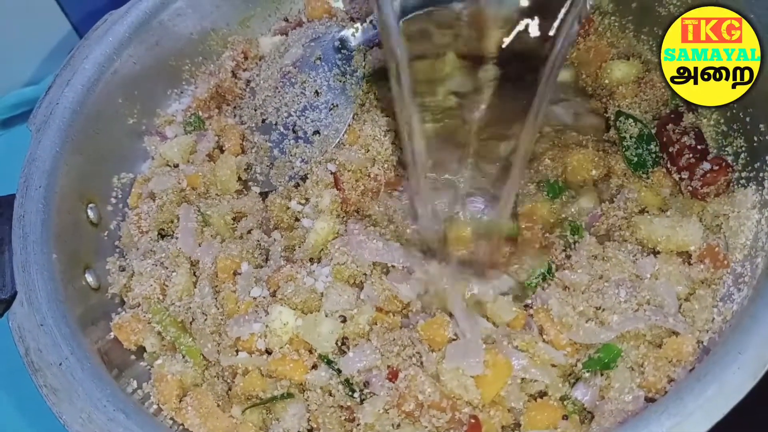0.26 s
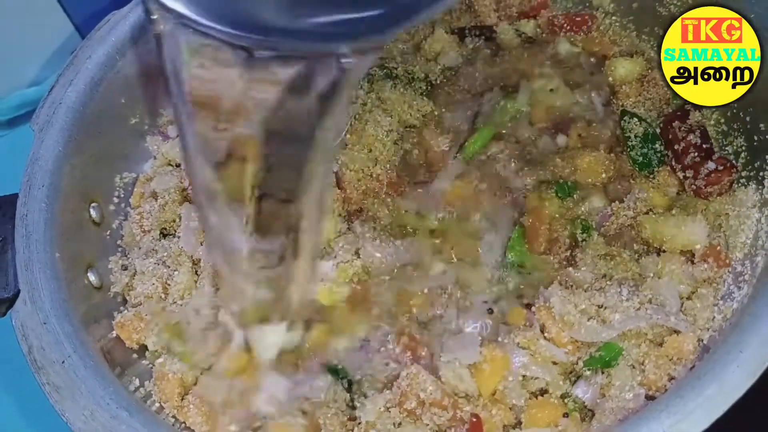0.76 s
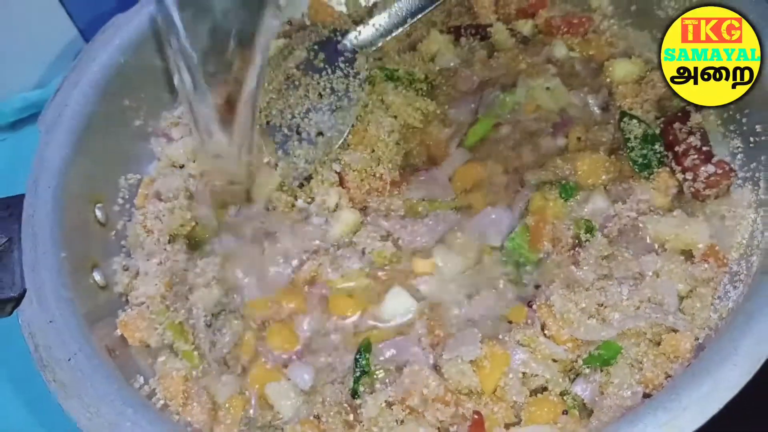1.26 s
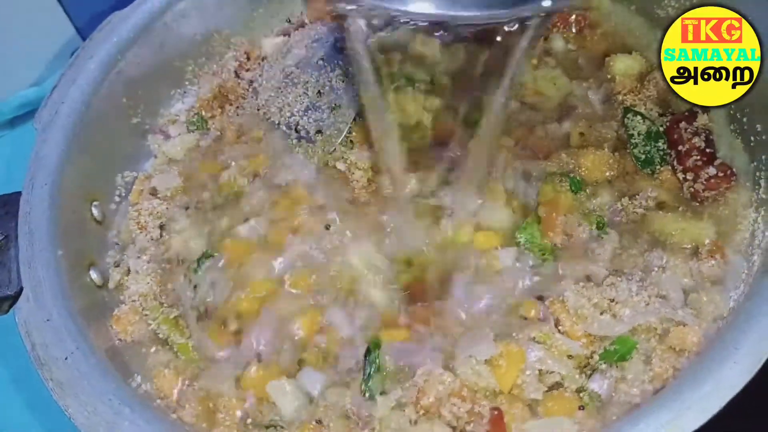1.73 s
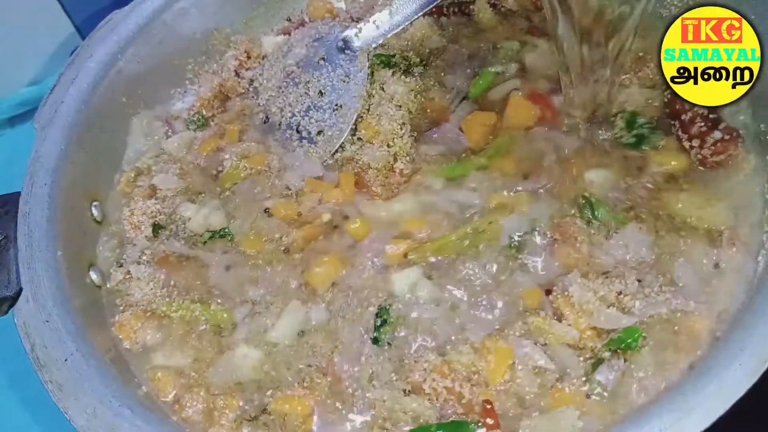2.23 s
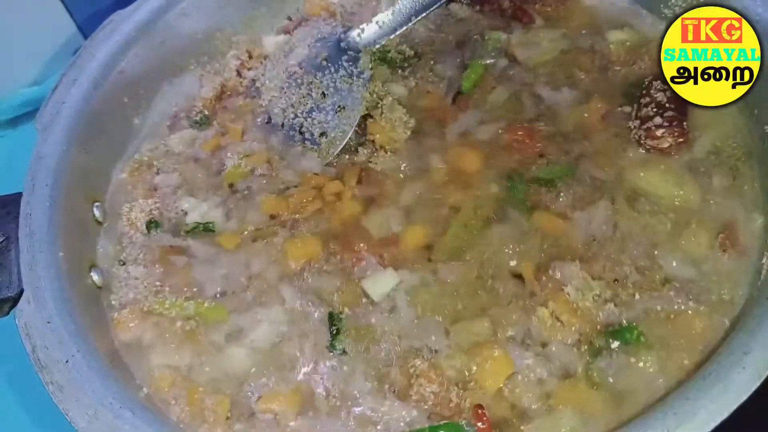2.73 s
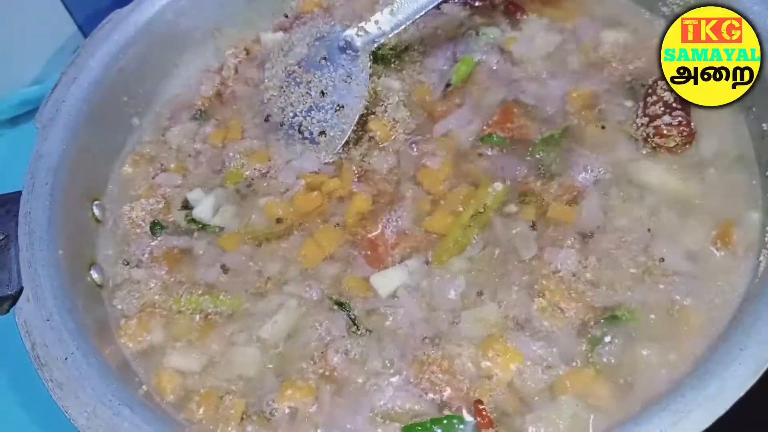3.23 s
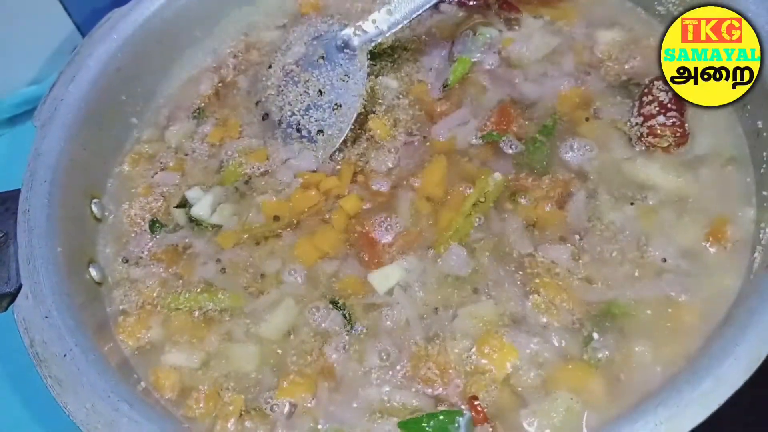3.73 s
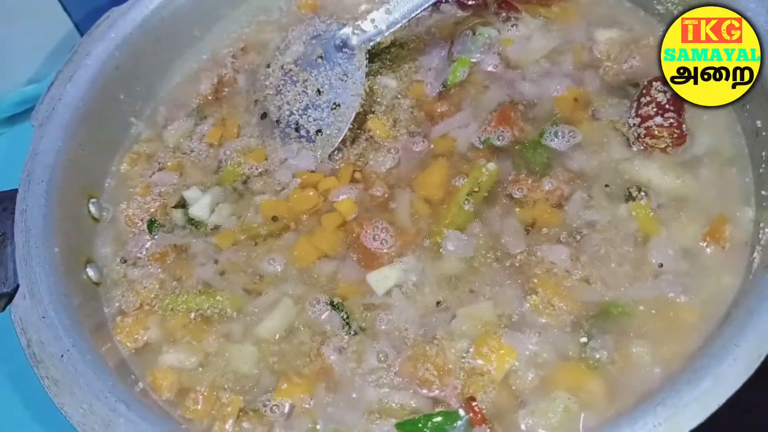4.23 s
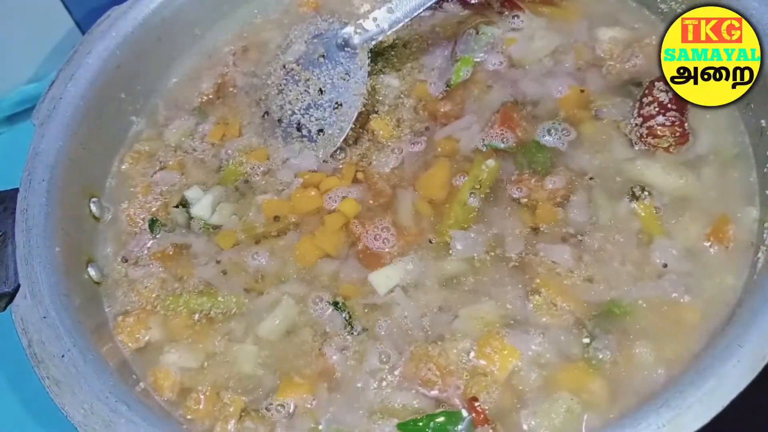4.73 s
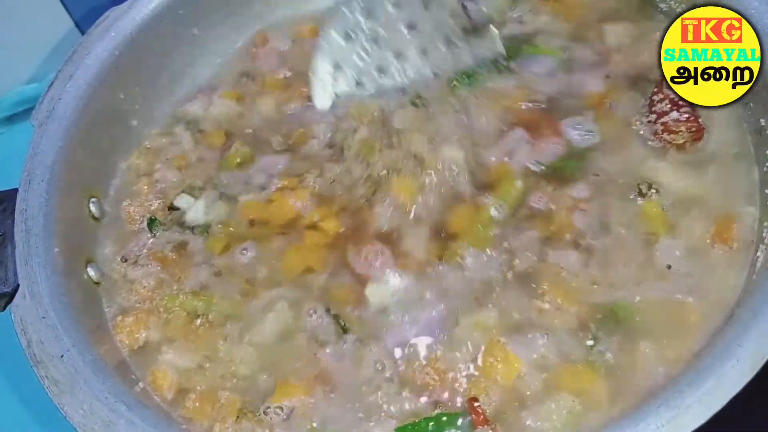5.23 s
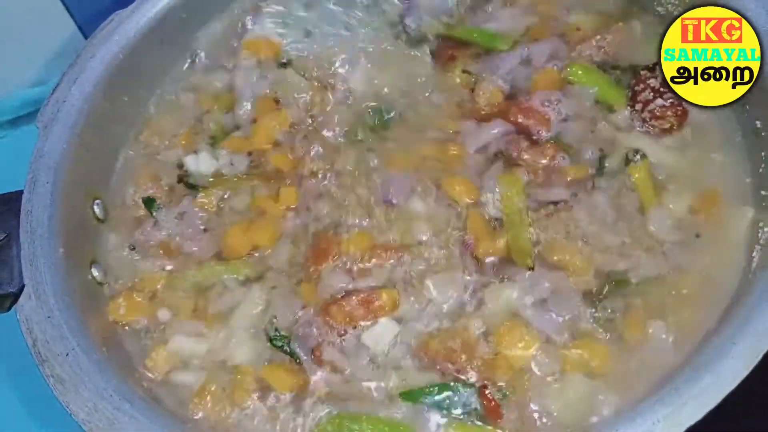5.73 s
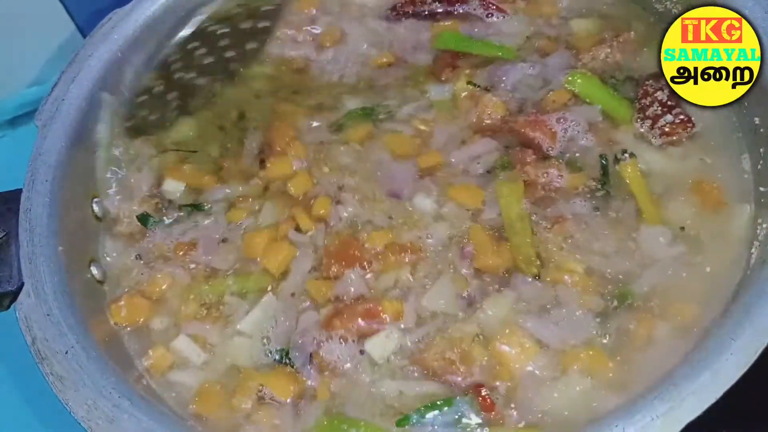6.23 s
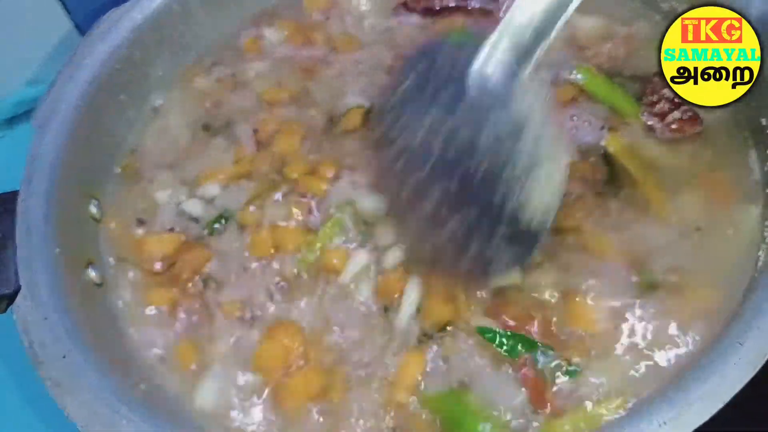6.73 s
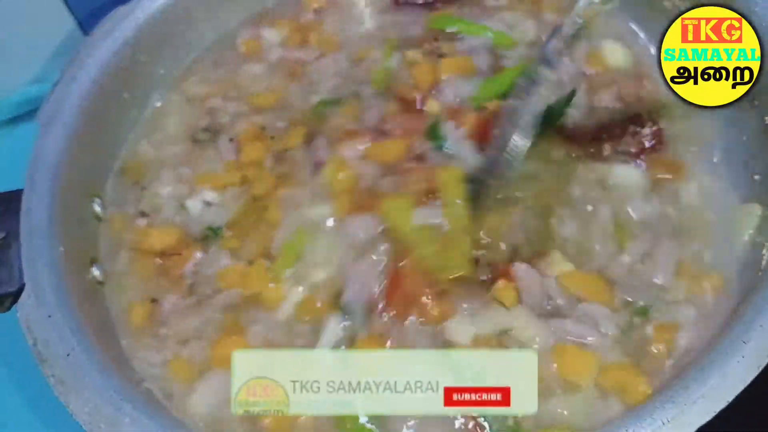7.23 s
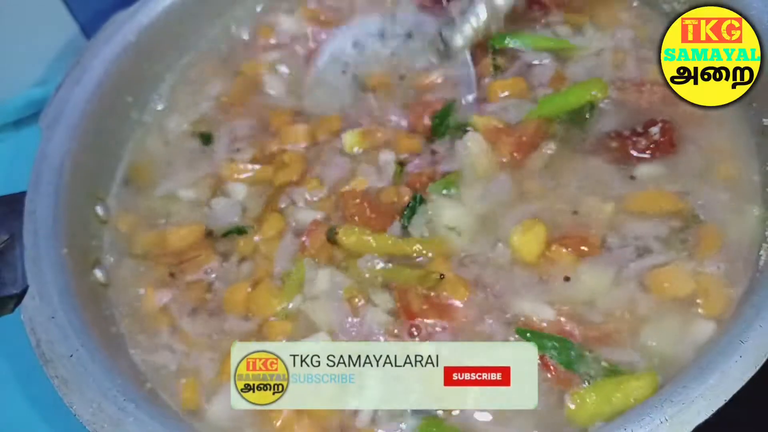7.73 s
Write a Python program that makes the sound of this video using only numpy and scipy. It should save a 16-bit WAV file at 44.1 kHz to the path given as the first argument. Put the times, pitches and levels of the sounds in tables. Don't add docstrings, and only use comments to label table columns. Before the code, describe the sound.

A phone placed near the stove picks up a strong crackling steam hiss for about three seconds, fading to almost nothing by four. A short, bright metallic clatter follows as a jug lands and bounces. Quiet bubbling, small spits and a faint gas hiss remain, with gentle sloshes from stirring. Two groups of ringing ladle strikes on the wet pan end with short room tails, over dull low bumps.

```python
import sys
import numpy as np
from scipy import signal
from scipy.fft import rfft, irfft
from scipy.io import wavfile
from scipy.ndimage import uniform_filter1d, map_coordinates

SR = 44100
rng = np.random.default_rng(int(sys.argv[2]) if len(sys.argv) > 2 else 0)


def transcribe(u):
    v = np.clip(np.atleast_2d(u).T, -1, 1)
    q = np.round(v * 32767).astype(np.int16)
    wavfile.write(sys.argv[1], SR, q)


def boost_factor(decibels):
    exponent = np.asarray(decibels, float) / 20
    return 10 ** exponent


N = 351918
T = np.arange(N) / SR
TOP_HZ = 15750
PORTS = np.array([[1], [-1]])

ZONE_EDGES_HZ = [240, 1550, 5050, 9200, 15700]
SIMMER_EDGES_HZ = [380, 1550, 3200, 5200, 6900]
# frequency_hz, level_db (per Hz)
SPRAY_COLOUR = [(8600, -25), (9300, -33), (10300, -14), (11500, -26), (12200, -6.5), (14900, -6),
                (15700, 2.5)]


def unit(x):
    return x / np.sqrt(np.mean(x ** 2))


def columns(rows):
    s, *cols = np.transpose(rows)
    return [np.interp(T, s, c) for c in cols]


def zone(x, edges, k):
    return signal.sosfilt(signal.butter(4, edges[k:k + 2], "bandpass", fs=SR, output="sos"), x)


def zoned(x, edges, gains):
    return [g * unit(zone(x, edges, k)) for k, g in enumerate(gains)]


def ring(x, hz, width_hz):
    return signal.lfilter(*signal.iirpeak(hz, hz / width_hz, fs=SR), x)


def tint(x, colour):
    hz, db = np.transpose(colour)
    log_hz = np.log(np.arange(1025) * SR / 2048 + 1)
    log_gain = np.log(boost_factor(np.interp(log_hz, np.log(hz), np.maximum(db, -50))))
    cepstrum = irfft(log_gain)
    cepstrum[1:1024] *= 2
    cepstrum[1025:] = 0
    response = irfft(np.exp(rfft(cepstrum)))
    return unit(signal.fftconvolve(x, response)[:len(x)])


def walk(rate):
    k = int(SR / rate)
    held = np.repeat(rng.standard_normal(N // k + 1), k)
    return unit(uniform_filter1d(uniform_filter1d(held, k), k)[:N])


def crackle(rate, spread_db):
    out, count = np.zeros(N), int(rate * N / SR)
    size_db = np.minimum(spread_db * rng.standard_exponential(N // 4), 5 * spread_db)[:count]
    at = rng.integers(0, N, N // 4)[:count]
    out[at] = rng.standard_normal(N // 4)[:count] * boost_factor(size_db)
    return unit(out)


def patchy(x, patch_db, patch_s, patch_hz, size=512):
    hz, s, spec = signal.stft(x, SR, nperseg=size)
    field = rng.standard_normal((400, 400))
    spots = map_coordinates(field, np.meshgrid(hz / patch_hz, s / patch_s, indexing="ij"), order=1)
    return signal.istft(spec * boost_factor(patch_db * spots), SR, nperseg=size)[1][:N]


def add(out, s, burst):
    at = int(s * SR)
    out[at:at + len(burst)] += burst[:len(out) - at]


def steam(colour, rate, spread_db, share, flicker_db):
    flicker = boost_factor(flicker_db * walk(14))
    return flicker * tint(share * crackle(rate, spread_db) + rng.standard_normal(N), colour)


def fine_steam(colour, rate, flicker_db):
    return unit(zone(steam(colour, rate, 2.2, .55, flicker_db), ZONE_EDGES_HZ, 3))


def steam_zones():
    # time_s, level_db, brightness_db, gurgle_db
    pour_curve = [(0.0, -28.5, 2, 3), (0.1, -25.5, 1, 0), (0.33, -22, -1.5, -4), (0.8, -23, 0, 0),
                  (1.03, -22.5, 2, 2), (1.45, -25.5, 2.5, 1), (2.2, -26, 2.5, -2), (2.55, -29.5, 3, -4),
                  (2.7, -27.5, 3, -5), (3.3, -30, 3, -2), (3.55, -34, 2, -5), (3.9, -40.5, 0, -3),
                  (4.27, -46.5, -4, -5)]
    # offset_db, brightness_share, gurgle_share
    pour_zones = [(-18, 0, 1.1), (-7.5, 0, .4), (-.6, 0, 0), (-3.8, 1, 0), (-16, 1.2, 0)]
    flutter_db = [1.8, 1.2, .4, .4, .4]
    level, bright, gurgle = columns(pour_curve)
    dbs = [level + db + b * bright + g * gurgle + f * walk(16)
           for (db, b, g), f in zip(pour_zones, flutter_db)]
    return boost_factor(np.array(dbs))


def boiling():
    # frequency_hz, level_db (per Hz)
    pour_colour = [(240, -28.5), (320, -13), (430, -17), (620, -10), (800, -8.5), (1170, 3.5), (1900, -1),
                   (2750, 3), (3050, -1), (4450, -1), (6050, 2), (7400, -6.5), (8500, -16), (9200, -22.5)]
    # frequency_hz, width_hz, level_db
    bubbles = [(320, 40, -29), (405, 30, -29), (1160, 150, -16), (1950, 300, -13), (2720, 260, -12),
               (3450, 300, -12), (4400, 350, -15), (5900, 450, -11)]
    # frequency_hz, width_hz, dry_depth (0-1),
    # flooded_depth (0-1)
    hollows = [(400, 130, 0., .7), (800, 150, 0., .55), (1520, 200, .45, .45)]
    flood_s = (1.4, 2.4)
    # middle_s, reach_s, frequency_hz, width_hz, level_db
    surges = [(.42, .15, 1170, 150, 1.5), (.75, .35, 7000, 1200, 2), (.85, .3, 770, 160, 5),
              (1.2, .4, 570, 200, -5), (1.7, .2, 890, 160, 4), (1.8, .3, 1950, 600, 3),
              (1.95, .3, 300, 110, -6), (2.25, .5, 560, 170, 6), (2.3, .3, 2050, 500, 4),
              (2.35, .45, 4700, 1100, 3), (2.8, .35, 800, 200, -7), (2.85, .25, 400, 130, -8),
              (3.2, .3, 540, 250, 6), (3.2, .25, 2080, 450, 4), (3.5, .15, 350, 120, -7),
              (3.7, .2, 2000, 500, 3), (3.98, .2, 500, 220, 7), (4.1, .25, 790, 250, -8),
              (2.7, .12, 6000, 900, 2), (.6, .5, 2700, 500, 1.5)]
    out = patchy(steam(pour_colour, 4000, 2.2, .4, .5), 2, .16, 260, size=256)
    for hz, width_hz, db in bubbles:
        bubble = unit(ring(crackle(width_hz * 5, 2.0), hz, width_hz))
        out = out + boost_factor(db + 2.0 * walk(5)) * bubble
    flood = np.interp(T, flood_s, [0, 1])
    for hz, width_hz, dry_depth, wet_depth in hollows:
        depth = dry_depth + (wet_depth - dry_depth) * flood
        out = out - depth * ring(out, hz, width_hz)
    for s, reach, hz, width_hz, db in surges:
        swell_db = db * np.exp(-((T - s) / reach) ** 2)
        out = out + (boost_factor(swell_db) - 1) * ring(out, hz, width_hz)
    return out


def pouring(share):
    pour_edges_hz = [240, 850, 1550, 5050, 9200]
    # frequency_hz, level_db (per Hz)
    fizz_colour = [(8600, -7), (9290, -21), (9900, -11.5), (10800, -13.5), (11500, -16.5), (12300, -11.5),
                   (14900, -4.5), (15700, -6)]
    *body_gains, fizz_gain = steam_zones() * share
    sizzle = sum(zoned(boiling(), pour_edges_hz, body_gains))
    return sizzle, fizz_gain * fine_steam(fizz_colour, 3000, 1.2)


def rattle_zones():
    # time_s, shaking_db
    rattle = [(4.295, -20), (4.33, -18.5), (4.36, -21), (4.405, -24), (4.412, -21), (4.425, -20.5),
              (4.48, -22), (4.545, -23.5), (4.68, -41), (4.775, -53), (4.85, -60)]
    # full_shaking_db, slope (dB per dB of shaking)
    rattle_slopes = [(-27, .75), (-18, 1.05), (-30, .95), (-43, 2.1)]
    shake = columns(rattle)[0] - rattle[1][1]
    return boost_factor(np.array([db + slope * shake for db, slope in rattle_slopes]))


def jug():
    # frequency_hz, level_db (per Hz)
    jug_colour = [(120, -46.5), (200, -14), (380, -18), (471, -8), (550, -13), (711, -9.5), (880, -23),
                  (1150, -5), (1410, -6.5), (1730, -4), (2200, -6), (2610, -3), (3680, -5), (4350, -11),
                  (4750, -20), (5400, -15), (6590, -18), (8500, -25), (8900, -36)]
    # frequency_hz, level_db (per Hz)
    sheen_colour = [(8800, 0), (11200, -3), (11800, -9), (14900, -2)]
    # start_s, peak_db, ring_hz
    bounces = [(4.2848, -8.5, 3280), (4.2998, -6.5, 2700), (4.3114, -7.5, 2690), (4.3218, -4.5, 1710),
               (4.3298, -2.5, 1820), (4.3394, -5, 2550), (4.3754, -11, 2600), (4.414, -8.5, 2630),
               (4.4225, -4.5, 3590), (4.4353, -15, 1760), (4.4514, -13.5, 3110), (4.478, -10.5, 3140),
               (4.4984, -12, 3150), (4.5394, -11, 3280)]
    clash = 0.59 * crackle(3000, 2.2) + rng.standard_normal(N)
    chatter = patchy(tint(clash, jug_colour), 3.5, .04, 110, size=1024)
    *body_gains, sheen_gain = rattle_zones()
    sheen = sheen_gain * unit(zone(tint(clash, sheen_colour), [8800, TOP_HZ], 0))
    gate = np.clip((T - bounces[0][0]) / .0015, 0, 1) * np.clip((4.9 - T) / 0.13, 0, 1)
    out = gate * boost_factor(-1.5) * (sum(zoned(chatter, ZONE_EDGES_HZ, body_gains)) + sheen)
    t = T[:SR // 8]
    shape = boost_factor(-60 * t / 0.075) - boost_factor(-60 * t / 0.00597)
    for s, db, hz in bounces:
        add(out, s, boost_factor(db - 9.5) * np.sin(2 * np.pi * hz * t) * shape)
    return out


def ladle():
    # start_s, thud_db, clang_db, tick_db,
    # strongest_ring_hz
    clinks = [(6.275, -70, -56, -54, 5200), (6.3716, -42, -38, -41, 2680), (6.4176, -34, -27, -26, 6150),
              (6.4342, -23, -18, -30, 2315), (6.4501, -34, -29, -36, 3370), (6.4872, -34, -33, -46, 2200),
              (6.5269, -36, -38, -50, 1000), (6.5856, -42, -44, -54, 3100), (6.6314, -46, -54, -56, 1220),
              (6.679, -60, -60, -54, 7600), (7.0446, -29, -18, -18.5, 5770), (7.1087, -21, -12, -29, 2720),
              (7.123, -30, -20, -40, 2020), (7.143, -32, -23, -42, 2560), (7.1685, -29, -23, -42, 2300),
              (7.1919, -27, -27, -57, 1290), (7.2234, -29, -31, -56, 1280), (7.3747, -54, -54, -52, 6000),
              (7.5883, -68, -64, -48, 5820), (7.6274, -70, -73, -60, 6450)]
    # frequency_hz, first_stir_db, second_stir_db, t60_s
    pan_modes = [(325, 1, -8.5, .2), (414.4, 2.5, -15, 0.28), (737, -7, -1, .2), (1200, -2, -7, 0.43),
                 (1240, 0, -3, 0.34), (1346, -6, 4.5, .2), (1754, -11, 1, 0.29), (2054, 10, 3, 0.41),
                 (2315, 10, 4.5, .25), (2714, -2, 3, 0.21), (3040, 4, 4, 0.25), (3360, 4, -2, .2),
                 (4150, -8, -14, .1), (5750, -7, 6, 0.17), (6100, -4, -4, .1), (6800, -6, 1, 0.18),
                 (7750, -15, 1, 0.11)]
    room_t60_s = [0.4, 0.42, .3, 0.17]
    # frequency_hz, level_db (per Hz)
    clank_colour = [(240, -16), (330, -10), (620, -5), (1200, 0), (1520, 3), (2700, 3), (4100, -1),
                    (6050, 2), (7400, -5), (9200, -22), (10300, -14), (11500, -17), (14900, -7)]
    # start_s, stop_s, frequency_hz, level_db
    bowl = (7.05, 7.11, 407, -36)
    out, t = np.zeros(N), T[:SR // 3]
    splash = tint(rng.standard_normal(N), clank_colour)
    for s, low_db, mid_db, high_db, hz in clinks:
        stir = 1 + (s > 7)
        rings = np.zeros(len(t))
        for mode, draw in zip(pan_modes, rng.standard_normal((len(pan_modes), 22))):
            waver_db = np.interp(t, np.linspace(0, .5, 20), 5.4 * draw[2:])
            decay = boost_factor(mode[stir] + waver_db - 60 * t / min(mode[3], .22))
            rings += decay * np.sin(2 * np.pi * mode[0] * (1 + .005 * draw[0]) * t + 3 * draw[1])
        rings = unit(rings) + boost_factor(20 - 60 * t / 0.052) * np.sin(2 * np.pi * hz * t)
        noise = splash[rng.integers(N - SR):][:len(t)]
        room_noise = noise - .45 * ring(noise, 3900, 1400)
        onset = np.clip(t / np.interp(high_db - low_db, [-30, -10], [.008, .0005]), 0, 1)
        tail_db = np.interp(high_db - mid_db, [-14, 0], [-9.5, -15])
        sheen_db = 1.35 * high_db - 7
        for k, db in enumerate([low_db - 7, mid_db - 8, high_db - 3, sheen_db - 8]):
            tail = boost_factor(tail_db - 60 * t / room_t60_s[k]) * (1 - (3 * t) ** 4)
            crack = noise * boost_factor(-60 * t / 0.019) + room_noise * tail
            hit = zone(onset * (unit(crack) + boost_factor(-9) * rings), ZONE_EDGES_HZ, k)
            add(out, s, boost_factor(db) * hit / np.sqrt(np.mean(hit[:SR // 100] ** 2)))
    start_s, stop_s, hum_hz, hum_db = bowl
    t = T[:int((stop_s - start_s) * SR)]
    add(out, start_s, boost_factor(hum_db) * np.minimum(t / 0.023, 1) * np.sin(2 * np.pi * hum_hz * t))
    return out


def steel():
    # start_s, frequency_hz, level_db, t60_s, swell_s
    lasting_rings = [(4.287, 640, -26, .12, .002), (4.3, 1766, -22, .35, .02), (4.3, 2659, -27, .3, .005),
                     (4.32, 3560, -29, .15, .01), (4.415, 1701, -25, .25, .005),
                     (4.418, 3655, -23, .22, .005), (4.43, 3125, -27, .6, .03), (4.43, 474, -31, .4, .02),
                     (4.48, 1160, -33, .35, .04), (4.41, 340, -35, .5, .03), (6.373, 1061, -39, .1, .002),
                     (6.373, 2094, -30, .08, .002), (6.434, 420, -37, .3, .003),
                     (6.434, 1200, -26, .5, .002), (6.434, 1235, -30, .55, .002),
                     (6.434, 1416, -35, .3, .002), (6.434, 2051, -31, .4, .002),
                     (6.434, 2315, -31, .3, .002), (6.434, 3068, -35, .3, .002),
                     (6.434, 3370, -31, .2, .002), (6.434, 5696, -36, .25, .002),
                     (7.045, 1222, -29, .2, .002), (7.045, 715, -38, .2, .002),
                     (7.045, 3386, -30, .2, .002), (7.045, 5800, -29, .25, .002),
                     (7.045, 6627, -33, .35, .002), (7.045, 7704, -33, .15, .002),
                     (7.109, 1255, -26, .4, .002), (7.109, 2735, -19, .1, .002),
                     (7.109, 2444, -29, .3, .002), (7.109, 3052, -32, .4, .002),
                     (7.109, 4050, -32, .2, .002), (7.15, 1319, -19.5, .2, .04), (7.37, 9950, -62, .1, .01)]
    out, t, knots = np.zeros(N), T[:SR // 2], np.linspace(0, .5, 50)
    draws = rng.standard_normal((len(lasting_rings), 2, 50))
    for (s, hz, db, t60, swell), (size, phase) in zip(lasting_rings, draws):
        slap = np.clip((t - swell) / .04, 0, 1)
        size = np.interp(t, knots, size) * slap
        phase = np.interp(t, knots, phase) * slap
        decay = boost_factor(db - 60 * np.maximum(t - swell, 0) / t60)
        shape = decay * np.minimum(t / swell, 1) ** 2 * (1 - (2 * t) ** 4)
        add(out, s, shape * (1 + .55 * size) * np.sin(2 * np.pi * hz * t + 1.1 * phase))
    return out


def simmer_zones():
    # time_s, level_db, brightness_db, spray_db
    simmer_curve = [(4.75, -55, 2, -68), (5.12, -58, 3, -67), (5.2, -63, 4, -70), (5.5, -72, 7, -76),
                    (5.61, -68, 8, -74), (5.74, -78, 6, -88), (5.8, -62, 1, -80), (5.86, -63, 4, -80),
                    (5.91, -55, 4, -72), (6.14, -76, 8, -85), (6.23, -62, 6, -82), (6.3, -55, 2, -68),
                    (6.7, -64, 4, -68), (6.9, -71, 4, -74), (7.04, -70, -1, -82), (7.37, -66, 1, -74),
                    (7.5, -70, 4, -89), (7.65, -82, -2, -95), (7.98, -82, -6, -90)]
    # offset_db, level_share, brightness_share
    simmer_shares = [(-33.5, .55, -.6), (-15, .75, -.4), (-4, .98, .1), (-12.5, .8, .9)]
    blub_db = [4, 3, 2.5, 2, 3]
    level, bright, spray = columns(simmer_curve)
    dbs = [db + a * level + b * bright for db, a, b in simmer_shares] + [spray]
    return boost_factor(np.array([db + f * walk(20) for db, f in zip(dbs, blub_db)]))


def burner():
    burner_edges_hz = [6900, 8250]
    return boost_factor(-64.5 + 1.2 * walk(5)) * unit(zone(rng.standard_normal(N), burner_edges_hz, 0))


def simmering(share):
    # frequency_hz, level_db (per Hz)
    simmer_colour = [(380, -5), (560, -3.5), (800, -8), (1050, 1.5), (1500, -3), (1950, -4.5), (2300, -5.5),
                     (2700, -3), (3600, -13), (4400, -2.5), (5100, -10), (5900, -2.5), (6900, -5)]
    calm_db = [-71, -70, -83, -76]
    *body_gains, spray_gain = simmer_zones() * share
    calm = np.hypot(body_gains, share * boost_factor(np.array(calm_db))[:, None])
    pot, unlike = [patchy(steam(simmer_colour, 2500, 2.0, .4, 1.1), 5.5, .1, 70, size=1024)
                   for _ in range(2)]
    body = sum(zoned(pot, SIMMER_EDGES_HZ, calm)) + burner()
    body = body + boost_factor(-10) * PORTS * sum(zoned(unlike, SIMMER_EDGES_HZ, calm[:3]))
    spray = patchy(fine_steam(SPRAY_COLOUR, 1500, 1.5), 4, .04, 500)
    spray = spray + boost_factor(-7) * PORTS * fine_steam(SPRAY_COLOUR, 1500, 1.5)
    return body, np.hypot(spray_gain, boost_factor(-95)) * spray


def bursts():
    # start_s, peak_db, ring_hz
    pops = [(4.9786, -42, 5930), (5.0115, -41, 5790), (5.0674, -40, 5950), (5.2405, -39, 6010),
            (5.7738, -44, 5570), (5.8541, -41, 6070), (5.8765, -42, 6100), (6.0397, -43, 6120),
            (6.2282, -44, 5370), (6.984, -49, 5880), (7.7204, -50, 7810), (7.8595, -51, 7710)]
    # start_s, peak_db
    spits = [(4.7446, -53), (4.7765, -54), (4.806, -53), (5.003, -55), (5.0599, -57), (5.1322, -51),
             (5.2121, -57), (5.3153, -57), (5.3457, -55), (5.439, -54), (5.6246, -57), (6.2851, -50),
             (6.5266, -48), (6.5535, -45), (6.6782, -42), (6.769, -59), (7.8531, -65)]
    out, t = np.zeros(N), T[:SR // 10]
    noise = rng.standard_normal(N)
    puff = unit(zone(noise, SIMMER_EDGES_HZ, 3))
    mist = unit(zone(tint(noise, SPRAY_COLOUR), ZONE_EDGES_HZ, 3))
    for s, db, hz in pops:
        shape = boost_factor(db - 6 - 60 * t / .03) * np.minimum(t / .001, 1)
        add(out, s, shape * (np.sin(2 * np.pi * hz * t) + .6 * puff[int(s * SR):][:len(t)]))
    for s, db in spits:
        add(out, s, boost_factor(db - 9 - 60 * t / .07) * mist[int(s * SR):][:len(t)])
    return out


def sloshes(noise):
    # start_s, level_db, pitch_hz, t60_s
    slosh_events = [
        (5.31, -57, 1040, .25),
        (5.44, -59, 1060, .2),
        (5.88, -60, 1050, .3),
        (6.6, -52, 330, .4),
        (7.665, -55, 590, .5),
    ]
    out, t = np.zeros(N), T[:SR // 2]
    for s, db, hz, t60 in slosh_events:
        swirl = unit(ring(ring(noise[int(s * SR / 2):][:len(t)], hz, 196), hz, 200))
        add(out, s, boost_factor(db - 60 * t / t60) * np.minimum(t / .01, 1) * swirl)
    return out


def counter_modes(drive):
    # frequency_hz, width_hz, level_db
    modes = [(88, 35, -2.5), (123.8, 11, -0.5), (173.8, 12, 2.5), (317.3, 31, -5), (394.6, 36, -10)]
    out = np.zeros(N)
    for k, (hz, width_hz, db) in enumerate(modes):
        mode = ring(drive[int(hz > 150)], hz, width_hz) / np.sqrt(width_hz / SR)
        out += (-1) ** k * boost_factor(db) * mode
    return signal.sosfilt(signal.butter(1, 70, "highpass", fs=SR, output="sos"), out)


def counter():
    # start_s, peak_db, t60_s, depth_db
    knocks = [(0.1, -39, .3, 2), (0.22, -37, .3, -2), (0.35, -38, .35, 2), (0.7, -44, .3, -6),
              (0.85, -37, .5, -8), (1.33, -38, .3, -12), (1.51, -45, .2, 4), (1.8, -47, .5, -3),
              (2.075, -33, .5, -2), (2.421, -35, 1.4, 2), (2.749, -35, .9, -2), (2.93, -37, .5, 0),
              (3.133, -38, .5, -2), (3.512, -36, .25, -3), (3.621, -36, .4, -4), (3.86, -41, .3, -3),
              (4.009, -39, .2, -4), (4.121, -40, .2, -4), (4.4, -31, .4, -8), (4.55, -33, .2, 0),
              (4.721, -31, .35, -1), (4.914, -42, .2, 4), (5.158, -42, .25, 0), (5.306, -35, .4, 5),
              (5.87, -49, .3, 2), (5.965, -47, .2, 5), (6.285, -34, .5, 1), (7.115, -36, .4, -6),
              (7.662, -38, .3, 3), (7.93, -38, .4, 3)]
    rumble = boost_factor(-63.5 + 4.5 * walk(12))
    noise = rng.standard_normal((4, N))
    drive, t = np.zeros((2, N)), T[:SR // 2]
    for s, db, t60, deep_db in knocks:
        shake = boost_factor(-19 - 60 * t / t60) * np.minimum(t / .006, 1) * noise[1, int(s * SR / 2):][:len(t)]
        shake = shake + boost_factor(-27) * (t < .002)
        add(drive[0], s, boost_factor(db + deep_db) * shake)
        add(drive[1], s, boost_factor(db) * shake)
    mid = rumble * unit(counter_modes(noise[[0, 0]])) + counter_modes(drive) + sloshes(noise[2])
    unlike_knocks = counter_modes(drive * np.sign(walk(40)))
    side = (rumble * unit(counter_modes(noise[[3, 3]])) + unlike_knocks) * boost_factor(-20)
    return mid * boost_factor(np.array([[-.8], [.8]])) + side * PORTS


def air_hiss():
    return boost_factor(-63) * unit(ring(ring(rng.standard_normal(N), 400, 900), 400, 1100)) * PORTS


def scene():
    quiet = np.clip((T - 4.3) / 0.26, 0, 1)
    sizzle, fizz = pouring(1 - quiet)
    simmer, spray = simmering(quiet)
    lean = boost_factor(quiet * np.array([[-1.5], [1.5]]))
    near = boost_factor(1.6) * (sizzle + simmer * lean + jug() + ladle())
    return near + steel() + bursts() + fizz + spray + counter() + air_hiss()


def band_limit(x):
    return signal.sosfilt(signal.butter(12, 16830, fs=SR, output="sos"), x)


def record(dry):
    # frequency_hz, width_hz, depth (0-1)
    notches = [(1519, 420, 0.62), (5113, 1150, 0.66)]
    for hz, width_hz, depth in notches:
        dry = dry - min(depth, .95) * ring(dry, hz, width_hz)
    mix = signal.sosfilt(signal.ellip(10, .3, 70, TOP_HZ, fs=SR, output="sos"), dry)
    return band_limit(mix)


dry = scene()
out = record(dry)
transcribe(out)
```